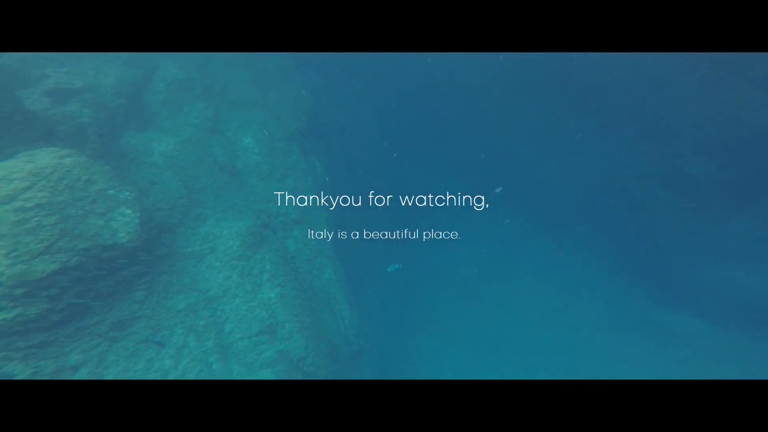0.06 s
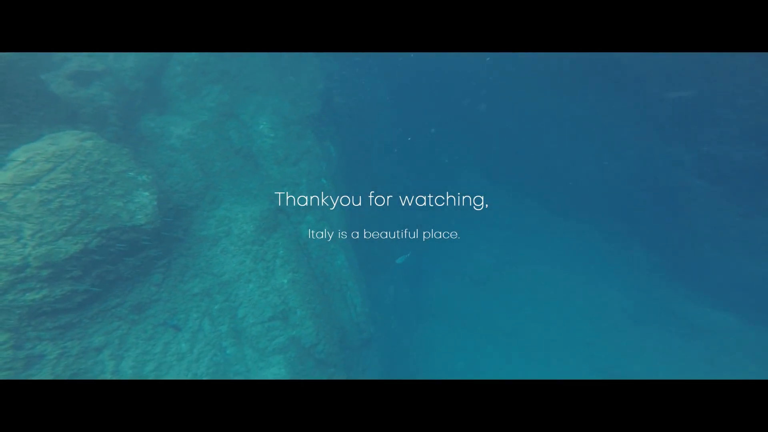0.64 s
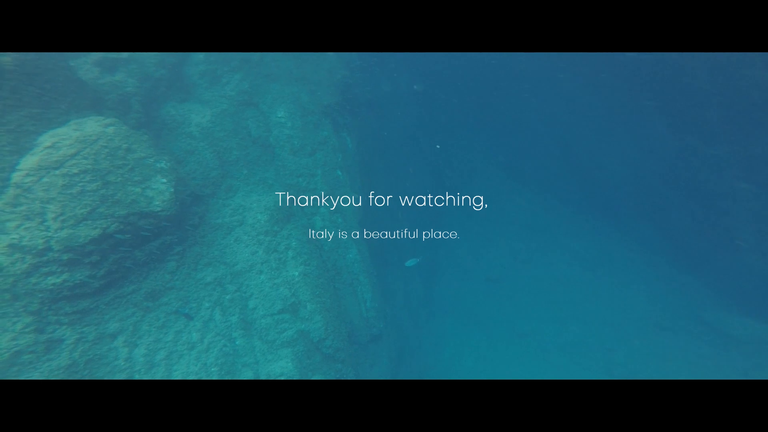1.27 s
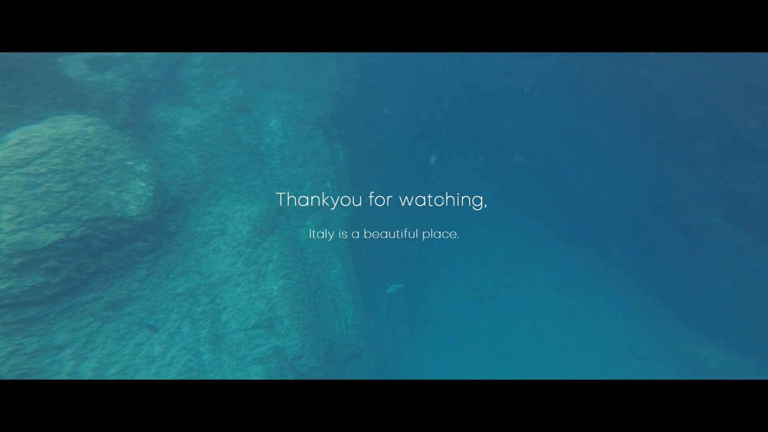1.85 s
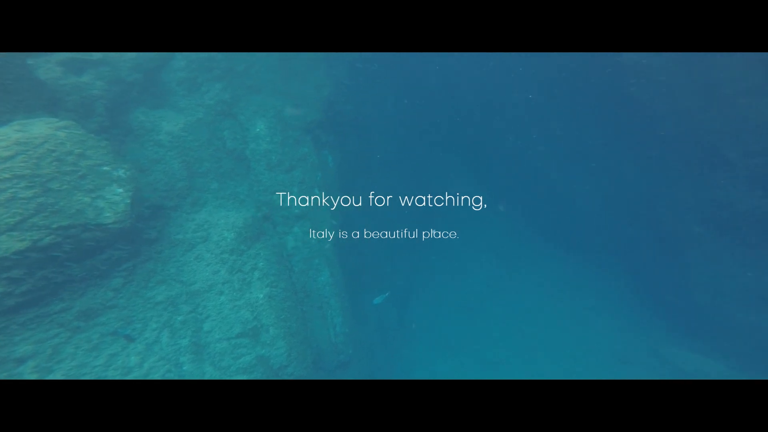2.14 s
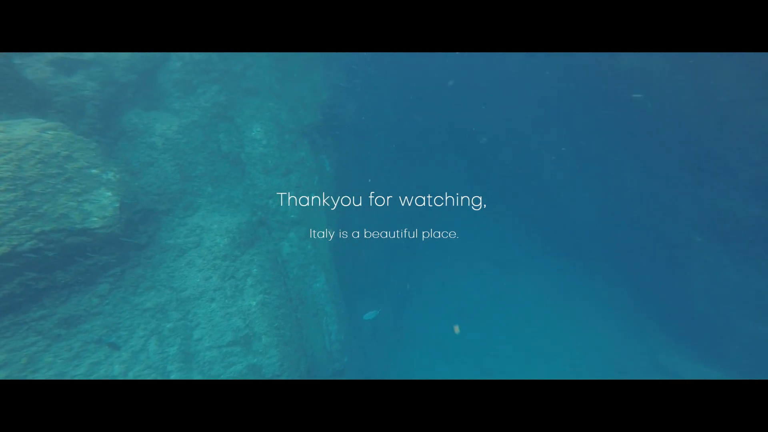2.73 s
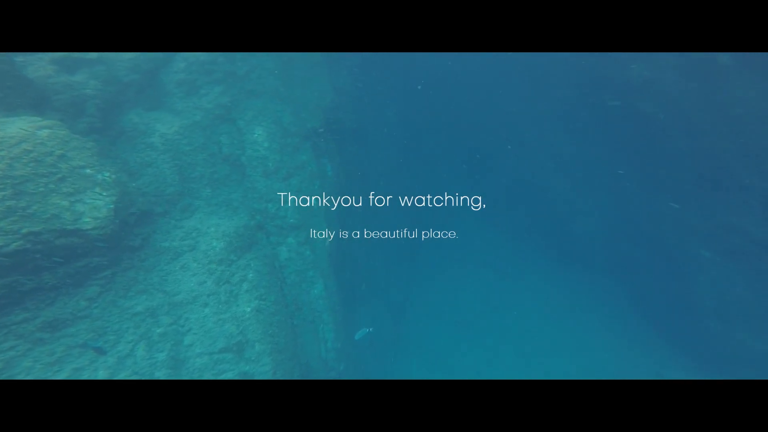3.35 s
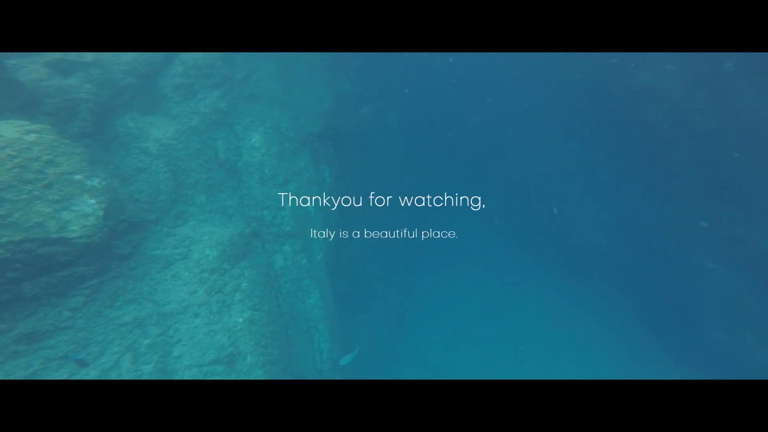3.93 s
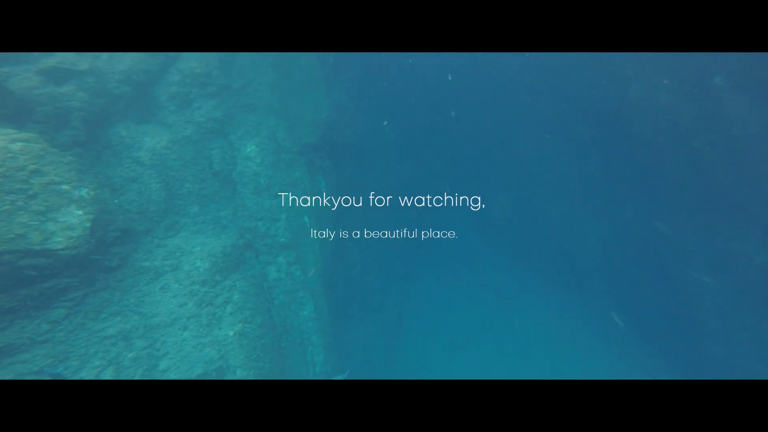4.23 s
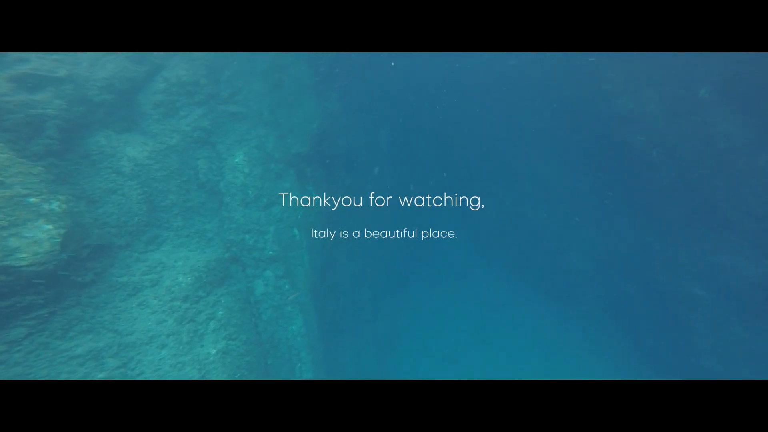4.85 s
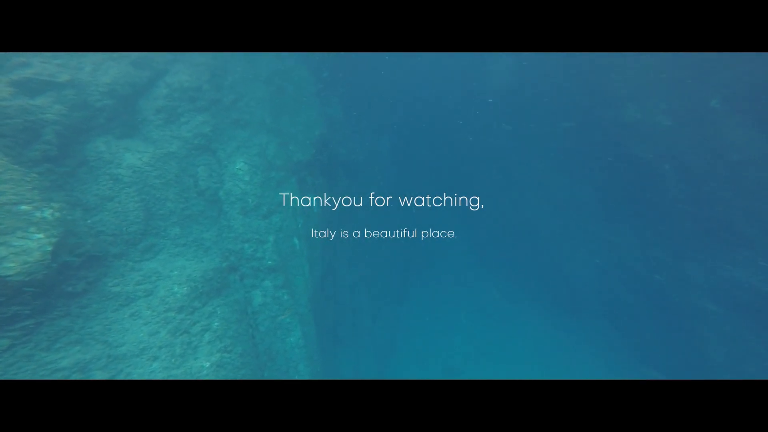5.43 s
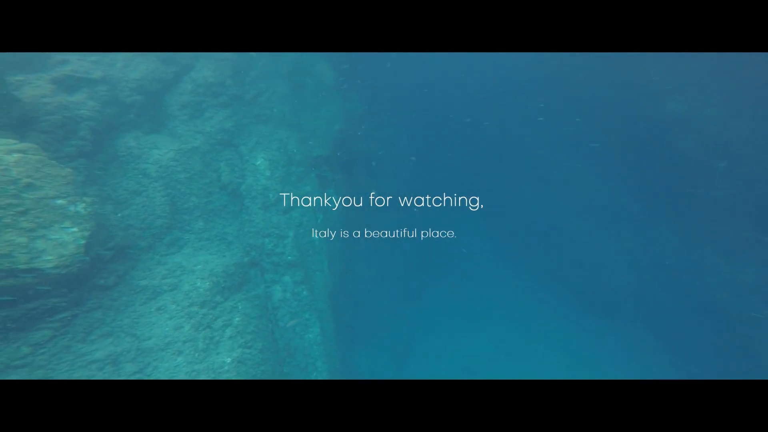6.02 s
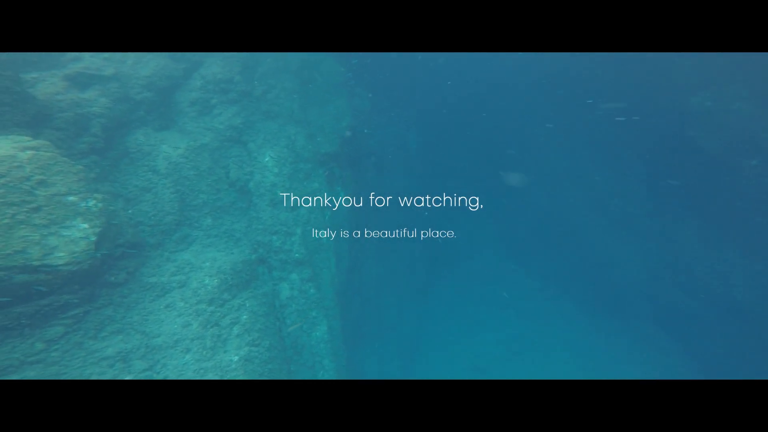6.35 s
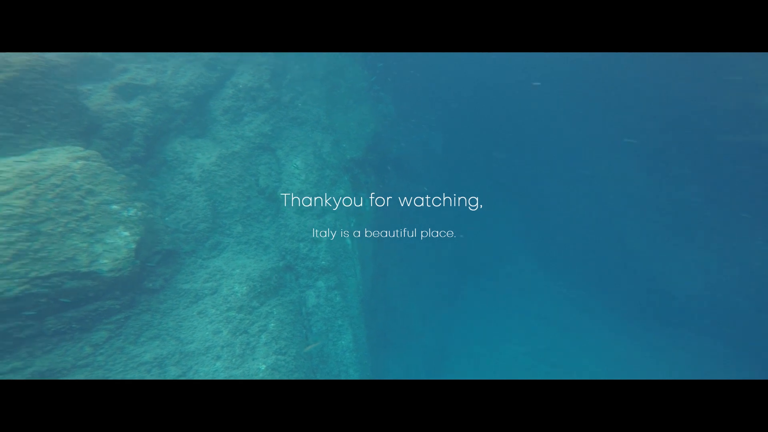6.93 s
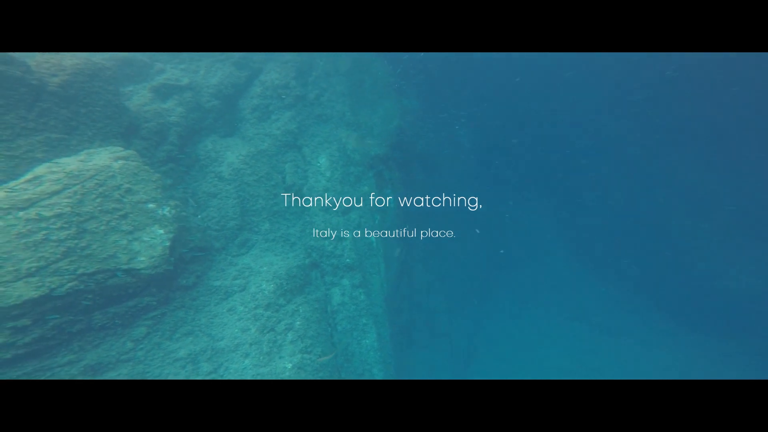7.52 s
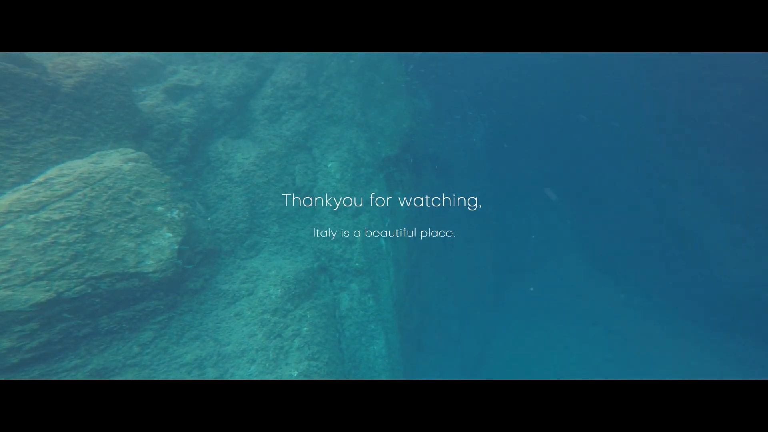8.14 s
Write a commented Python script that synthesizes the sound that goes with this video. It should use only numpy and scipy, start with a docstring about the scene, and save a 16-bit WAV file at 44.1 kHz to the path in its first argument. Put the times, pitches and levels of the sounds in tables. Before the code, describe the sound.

Heard from under the surface near a rocky sea floor, seawater moves in regular surges. Each starts abruptly with a deep, throbbing rumble and muffled sloshes, then ebbs away before the next arrives, a little under two seconds later. Bubbles blip, gurgle and trickle in the churning water. Faint sharp snaps, like shrimp on the rocks, crackle throughout over a soft, steady hiss.

```python
"""Underwater surge on a rocky shore

One surge of the sea starts abruptly, ebbs away and repeats as a loop. Its turbulence rumbles,
pockets of air and water churn, and muffled sloshes spin up a throbbing eddy. Bubbles ring by
volume resonance, singly as blips and in swarms as gurgle, trickle and fizz. Faint sharp snaps,
as of shrimp on the rocks, crackle over the steady hiss of the far sea."""
import sys
import numpy as np
from scipy import signal
from scipy.fft import rfft, irfft
from scipy.io import wavfile
from scipy.ndimage import uniform_filter1d

SR = 44100
rng = np.random.default_rng(int(sys.argv[2]) if len(sys.argv) > 2 else 0)


def output_pcm(signal):
    """Save a mono or channel-first signal as 16-bit PCM at the path in sys.argv[1].

    Samples are clipped to [-1, 1] before scaling.
    """
    pcm = np.clip(np.atleast_2d(signal).T, -1, 1) * 32767
    wavfile.write(sys.argv[1], SR, np.round(pcm).astype(np.int16))


N = 360738
SIZE = 147456   # samples in the track of one surge
TIME = np.arange(SIZE) / SR
BINS_HZ = np.arange(SIZE // 2 + 1) * SR / SIZE
SURGE_START_S, SURGE_END_S = 1.512, 3.24   # on that track


def from_db(db):
    """Amplitude ratio of a level in decibels."""
    return 10 ** (np.asarray(db) / 20)


def unit_rms(x):
    """Normalisation to unit mean power."""
    return x / np.sqrt(np.mean(x ** 2) + 1e-20)


def coloured(x, spectrum):
    """Spectral shaping, with a further 24 dB per octave of roll-off beyond the table; rms 1."""
    hz, db = np.transpose(spectrum)
    bins = np.maximum(BINS_HZ, 1)
    gain = from_db(np.interp(np.log(bins), np.log(hz), db))
    skirts = np.minimum(bins / hz[0], 1) * np.minimum(hz[-1] / bins, 1)
    return unit_rms(irfft(rfft(x) * gain * skirts ** 4))


def noise():
    """Gaussian white noise."""
    return rng.standard_normal(SIZE)


def drift(rate_hz):
    """Slow random fluctuation: noise low-passed at rate_hz; rms 1."""
    return unit_rms(irfft(rfft(noise()) / (1 + (BINS_HZ / rate_hz) ** 2)))


def evened(x, span_s):
    """Division by the running rms holds the power steady and keeps the faster flutter."""
    width = max(int(span_s * SR), 2)
    power = uniform_filter1d(uniform_filter1d(x ** 2, width), width)
    return x / np.sqrt(np.maximum(power, 1e-12))


def impulses(per_s, spread_db):
    """Shot noise: a Poisson train of clicks of random size and sign."""
    sizes = from_db(spread_db * np.minimum(rng.exponential(1, SIZE), 4))
    return sizes * rng.choice([-1, 1], SIZE) * (rng.random(SIZE) < per_s / SR)


def split(x, hz):
    """Complementary crossover: the parts of x below and above hz."""
    low = signal.sosfiltfilt(signal.butter(3, hz, fs=SR, output="sos"), x)
    return low, x - low


def resonance(x, hz, width_hz):
    """Two-pole resonator with unit gain at its peak."""
    r = np.exp(-np.pi * width_hz / SR)
    feedback = [1, -2 * r * np.cos(2 * np.pi * hz / SR), r * r]
    return signal.lfilter(np.array([1, 0, -1]) * (1 - r * r) / 2, feedback, x)


def add(track, start_s, sound):
    """Superposition of a sound on the track."""
    part = track[round(start_s * SR):][:len(sound)]
    part += sound[:len(part)]


# Spectrum of the far sea: f/Hz, relative level/dB
FAR_SEA_SPECTRUM = [(400, -3.5), (1000, -2.5), (1800, 0.5), (2400, -3.5), (3000, -9), (3500, -11.5),
                    (4000, -10.5), (4480, -6.5), (5100, -10.5), (6000, -9.5), (7200, -12.5), (10000, -9.5),
                    (15000, -31)]

def far_sea():
    """Ambient noise: the distant sea is a stationary broadband hiss."""
    return from_db(-75.5) * coloured(noise(), FAR_SEA_SPECTRUM)


# Flow between sloshes: t/s, rumble level/dB, churn level/dB
FLOW_LEVELS = [(1.52, -34, -49), (1.62, -31, -51.5), (1.7, -32, -48.5), (1.82, -32.5, -46.5),
               (2.0, -35.5, -48.5), (2.27, -35.5, -51), (2.37, -43.5, -48.5), (2.69, -40, -54.5),
               (2.78, -46, -49), (3.08, -46, -60.5), (3.2, -47.5, -50.5)]

def ebbing_flow():
    """Flow noise weakens as the surge ebbs; returns rumble power and churn power."""
    times, *levels = np.transpose(FLOW_LEVELS)
    return [from_db(np.interp(TIME, times, db)) ** 2 for db in levels]


# Spectrum of the turbulence: f/Hz, relative level/dB
RUMBLE_SPECTRUM = [(12, -20.5), (22, -6), (35, 0), (55, 0.5), (80, -2.5), (115, -2), (150, -7.5),
                   (190, -33), (260, -33)]

def rumble(level_db, eddy_hz, unrest=0.7):
    """Pressure fluctuation: one large eddy throbs almost periodically amid broadband turbulence."""
    ebb_db = level_db - level_db.max()
    phase = 2 * np.pi * np.cumsum(eddy_hz) / SR
    in_phase = (1 + unrest * drift(rate_hz=14.8)) * np.sin(phase)
    quadrature = unrest * drift(rate_hz=24.5) * np.cos(phase)   # varies the timing of each turn
    eddy = evened(in_phase + quadrature, span_s=0.011)
    eddy *= from_db(-1 + 0.55 * ebb_db)   # the eddy breaks up as the flow ebbs
    deep, upper = split(coloured(noise(), RUMBLE_SPECTRUM), hz=48)
    deep *= from_db(0.15 * ebb_db)   # the deepest motion dies first
    turbulence = from_db(-2) * evened(deep + upper, span_s=0.084)
    return from_db(level_db) * evened(eddy + turbulence, span_s=0.058)


# Spectrum of the thuds: f/Hz, relative level/dB
CHURN_SPECTRUM = [(110, -29.5), (170, 3.5), (210, -1.5), (245, 1), (275, -1), (310, 3), (350, -1.5),
                  (400, -10.5), (450, -10.5), (520, -39), (700, -48)]

def churn(level_db, tilt_db, muffle_hz=428.6):
    """Random impacts: pockets of air and water knock about in dense, muffled thuds."""
    thuds = coloured(impulses(per_s=600, spread_db=1), CHURN_SPECTRUM)
    lower, upper = split(thuds, hz=238)
    tilted = evened(lower + from_db(tilt_db - 3.5) * upper, span_s=0.017)
    muffle = signal.butter(7, muffle_hz, fs=SR, output="sos")
    return signal.sosfiltfilt(muffle, from_db(level_db) * tilted)


# Single bubbles: t/s at the peak, peak level/dB, f/Hz, swell time/ms
BUBBLE_BLIPS = [(1.517, -28.5, 214, 4), (1.5508, -54, 1140, 1.5), (1.5675, -32, 285, 4.24),
                (1.608, -46.5, 806, 3.68), (1.616, -54.5, 1345, 2.8), (1.711, -61.5, 1210, 2.7),
                (1.757, -56, 1263, 1.72), (2.094, -55, 1188, 1.82), (2.132, -55.5, 942, 1.53),
                (2.147, -30.5, 180.6, 3.7), (2.175, -55.5, 2840, 0.54), (2.1767, -53.5, 1110, .5),
                (2.192, -31, 184.3, 4.45), (2.372, -54.5, 1260, 4.08), (2.381, -46, 1195, 0.97),
                (2.451, -64.5, 1154, 6.2), (2.483, -66, 4450, 1.3), (2.486, -60.5, 1330, 6),
                (2.562, -68, 4370, 2), (2.597, -60, 1252, 1.83), (2.688, -55.5, 1422, 1.9),
                (2.6977, -51.5, 1486, .5), (2.7345, -66, 4520, 1.3), (2.958, -40, 243.2, 4.5),
                (2.972, -61, 1426, 1.8), (3.0698, -59, 1354, 1.3), (3.212, -69.5, 4370, 1.4)]

def bubbles(rise=0.03, wobble=0.047):
    """Volume resonance: each bubble rings under a Gaussian envelope, its pitch wobbling and rising."""
    out = np.zeros(SIZE)
    t = np.arange(-SR // 40, SR // 40) / SR
    for peak_s, db, hz, swell_ms in BUBBLE_BLIPS:
        age = t / (swell_ms / 1000)
        period = round(SR / hz)
        jitter = uniform_filter1d(rng.standard_normal(len(t)), period)
        jitter = unit_rms(uniform_filter1d(jitter, 2 * period))
        phase = 2 * np.pi * np.cumsum(hz * (1 + rise * age + wobble * jitter)) / SR
        add(out, peak_s + t[0], from_db(db) * np.exp(-age ** 2) * np.sin(phase))
    return out


# Sloshes: t/s, duration/s, churn level/dB, rumble level/dB, relative treble tilt/dB
SLOSH_EVENTS = [(1.529, .088, -36.5, -37.5, 7), (1.961, 0.024, -51.5, -32, 1),
                (2.017, .15, -41, -35.5, -6.5), (2.268, 0.044, -45, -35.5, 3), (2.381, 0.033, -46, -34, 11),
                (2.465, 0.0764, -40, -40, 0.5), (2.522, 0.093, -45, -33.5, 6.5),
                (2.687, 0.024, -47, -45.5, 10), (2.943, 0.044, -43.5, -39.5, -5.5)]

def sloshes(attack_s=0.02322, release_s=0.0214):
    """Incoherent sources add in power; returns churn power, rumble power and power-weighted tilt."""
    churn_power = rumble_power = weighted_tilt = 0
    for start_s, length_s, churn_db, rumble_db, tilt_db in SLOSH_EVENTS:
        age = TIME - start_s
        envelope = np.clip(age / attack_s, 0, 1) * np.exp(-np.clip((age - length_s) / release_s, 0, 20))
        power = (from_db(churn_db) * envelope) ** 2
        churn_power += power
        rumble_power += (from_db(rumble_db) * envelope) ** 2
        weighted_tilt += tilt_db * power
    return churn_power, rumble_power, weighted_tilt


def eddy_pitch(slosh_power, rest_hz=60.88, spin_hz=72.49, lag_s=0.1):
    """Inertia: a slosh spins the eddy up with a first-order lag, and it then runs down again."""
    r = np.exp(-1 / (lag_s * SR))
    drive = slosh_power / slosh_power.max()
    return rest_hz + spin_hz * signal.lfilter([1 - r], [1, -r], drive)


# Drive of the swarms, one row each for gurgle, low trickle, high trickle and fizz:
# relative level/dB at rest, from the full flow, from full aeration, from the full inrush
SWARM_DRIVE = [(-73, -83, -67.5, -60.5), (-79, -70.5, -72, -88), (-78.5, -97, -69, -74),
               (-83.5, -85.5, -100, -78.5)]

def swarm_gains(flow_power, slosh_power, half_aerated_db=-39.5, patchy_db=1):
    """Power summation: flow, sloshes and inrush stir each swarm, whose level also drifts by chance."""
    flow = flow_power / flow_power.max()
    aeration = slosh_power / (slosh_power + from_db(half_aerated_db) ** 2)
    inrush = np.clip((TIME - 2.997) / 0.17, 0, 1) ** 2   # water gathers ahead of the next surge
    powers = from_db(SWARM_DRIVE) ** 2 @ np.array([np.ones(SIZE), flow, aeration, inrush])
    return [np.sqrt(power) * from_db(patchy_db * drift(rate_hz=17)) for power in powers]


def swarm(spectrum, per_s):
    """Bubbles of about one size, excited at random, ring in one band; rms near 1."""
    return evened(coloured(impulses(per_s, spread_db=4.5), spectrum), span_s=0.18)


# Spectra of the swarms, largest bubbles first: f/Hz, relative level/dB
GURGLE_SPECTRUM = [(380, -7), (480, -1.5), (570, -5), (680, -14), (850, -28)]
LOW_TRICKLE_SPECTRUM = [(600, 5.5), (720, 2.5), (800, 2.5), (880, 1), (1000, -15.5)]
HIGH_TRICKLE_SPECTRUM = [(900, -11), (1130, -4.5), (1270, -4), (1380, -7), (1500, -5), (1800, -20.5),
                         (2400, -27.5)]
FIZZ_SPECTRUM = [(6800, -32), (7800, -9), (8500, 4), (9000, 0.5), (9600, 3), (10100, -12.5), (11000, -9.5),
                 (12000, -12), (13500, -24), (15000, -27.5)]

def bubble_swarms(gurgle_gain, low_gain, high_gain, fizz_gain):
    """Resonant frequency rises as radius falls: four sizes of bubble fill four bands."""
    gurgle = gurgle_gain * from_db(-5.5) * swarm(GURGLE_SPECTRUM, per_s=930)
    low_trickle = low_gain * from_db(-2) * swarm(LOW_TRICKLE_SPECTRUM, per_s=670)
    high_trickle = high_gain * from_db(-3) * swarm(HIGH_TRICKLE_SPECTRUM, per_s=1100)
    fizz = fizz_gain * from_db(-1.5) * coloured(impulses(per_s=2700, spread_db=-0.5), FIZZ_SPECTRUM)
    return gurgle + low_trickle + high_trickle + fizz


# Resonances of every snap: f/Hz, bandwidth/Hz, relative level/dB
SNAP_RESONANCES = [(3020, 320, 4), (4470, 310, 5.5), (5540, 1300, -3.5), (8740, 800, 5), (10320, 960, 1),
                   (14600, 740, -21.5)]

def snap(edge_hz, decay_s=0.0008):
    """Cavity collapse: the rock scatters the pulse into a millisecond of bright ringing; peak 1."""
    t = TIME[:SR // 100]
    burst = rng.standard_normal(len(t)) * np.exp(-t / decay_s)
    burst = signal.sosfilt(signal.butter(8, edge_hz, "high", fs=SR, output="sos"), burst)
    ring = sum((-1) ** k * from_db(db) * resonance(burst, hz, width_hz)
               for k, (hz, width_hz, db) in enumerate(SNAP_RESONANCES))
    return ring / np.abs(ring).max()


# Near snaps: t/s, relative peak level/dB, f/Hz of the lower band edge
NEAR_SNAPS = [(1.6648, -61.5, 8500), (1.693, -57, 6360), (1.727, -57.5, 8800), (1.8122, -51, 3670),
              (1.9226, -56, 3660), (2.0106, -55.5, 7460), (2.1746, -45, 5070), (2.2512, -58, 6660),
              (2.2678, -58, 4000), (2.34, -52.5, 3840), (2.356, -56, 3820), (2.361, -59.5, 6440),
              (2.4278, -60, 8000), (2.455, -60, 7500), (2.6614, -51, 7100), (2.7167, -58.5, 8000),
              (2.8537, -55.5, 3830), (3.027, -60, 7500), (3.0499, -52, 3200), (3.1526, -50, 7700),
              (3.1638, -54, 7850), (3.231, -49.5, 3130)]

def shrimp(near_gain_db=1, far_db=-69, spread_db=11):
    """Superposed transients: near snaps at set times crackle over many far ones at random times."""
    out = np.zeros(SIZE)
    for start_s, db, edge_hz in NEAR_SNAPS:
        add(out, start_s, from_db(db + near_gain_db) * snap(edge_hz))
    for when, size, colour in rng.random(size=(90, 3)):
        start_s = SURGE_START_S + when * (SURGE_END_S - SURGE_START_S)
        add(out, start_s, from_db(far_db + spread_db * size ** 2) * snap(edge_hz=4000 + 5000 * colour))
    return out


# Start of each pass of the surge in the output: t/s
PASS_STARTS_S = [-.2159, 1.512, 3.2203, 4.9287, 6.637]

def looped(surge, crossfade_s=0.004):
    """Repetition: each pass starts the same surge afresh and crossfades out the one before."""
    out, t = np.zeros(N), np.arange(N) / SR
    for start, end in zip(PASS_STARTS_S, PASS_STARTS_S[1:] + [np.inf]):
        window = np.clip(np.minimum(t - start, end - t) / crossfade_s + 0.5, 0, 1)
        source = np.clip(np.arange(N) + round((SURGE_START_S - start) * SR), 0, SIZE - 1)
        out += np.sin(np.pi / 2 * window) ** 2 * surge[source]
    return out


def scene(flow_tilt_db=4.5, onset_s=0.006):
    """Linear superposition of moving water, bubbles, snaps and the far sea, looped in one channel."""
    flow_rumble, flow_churn = ebbing_flow()
    slosh_churn, slosh_rumble, slosh_tilt = sloshes()
    rumble_db, churn_db = 10 * np.log10([flow_rumble + slosh_rumble, flow_churn + slosh_churn])
    tilt_db = (flow_tilt_db * flow_churn + slosh_tilt) / (flow_churn + slosh_churn)
    onset = np.sin(np.pi / 2 * np.clip((TIME - SURGE_START_S) / onset_s, 0, 1)) ** 2
    water = rumble(rumble_db, eddy_pitch(slosh_churn)) + churn(churn_db, tilt_db)
    blips_and_snaps = bubbles() + shrimp()
    hiss = far_sea()
    swarms = bubble_swarms(*swarm_gains(flow_rumble, slosh_churn))
    return looped(onset * water + swarms + blips_and_snaps + hiss)[None]


def record(dry):
    """Band limiting: after a 4 ms fade-in, a steep low-pass is 60 dB down from 15.5 kHz."""
    fade_in = np.minimum(np.arange(N) / (0.004 * SR), 1)
    return signal.sosfilt(signal.cheby2(14, 60, 15500, fs=SR, output="sos"), dry * fade_in)


dry = scene()
out = record(dry)
output_pcm(out)
```